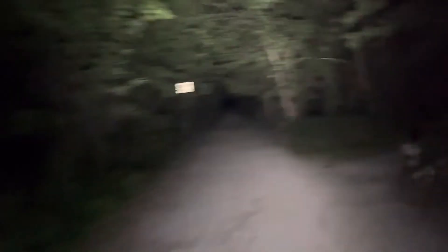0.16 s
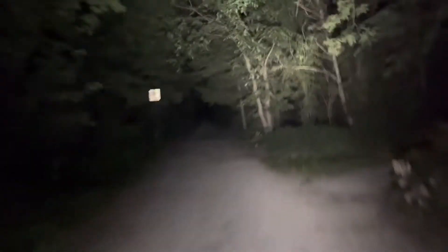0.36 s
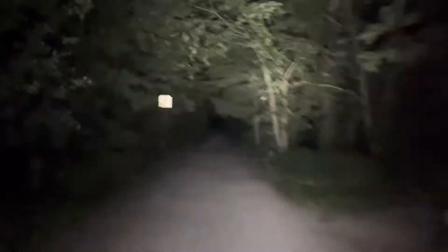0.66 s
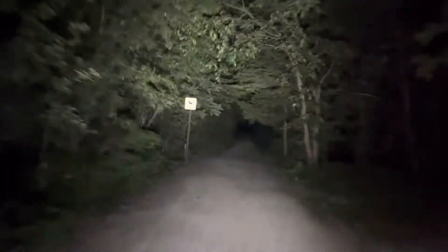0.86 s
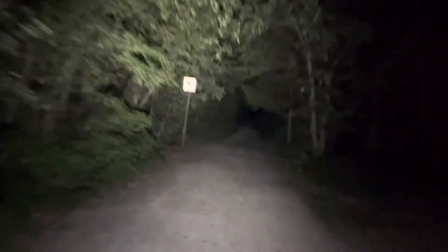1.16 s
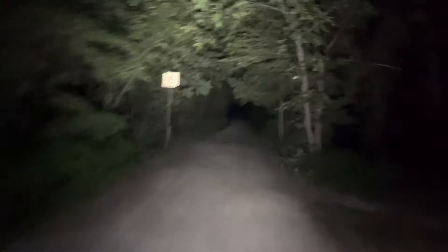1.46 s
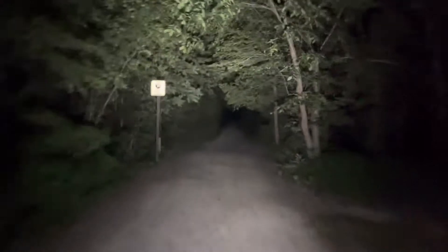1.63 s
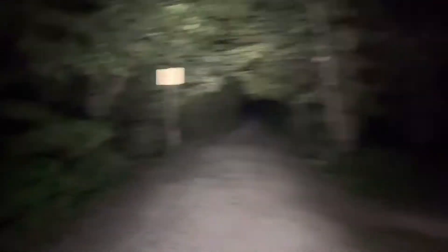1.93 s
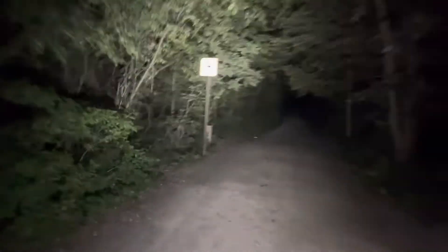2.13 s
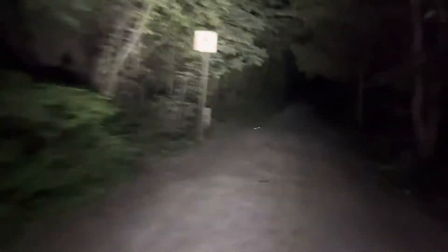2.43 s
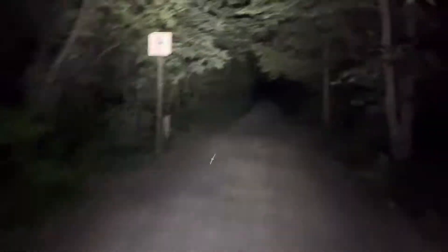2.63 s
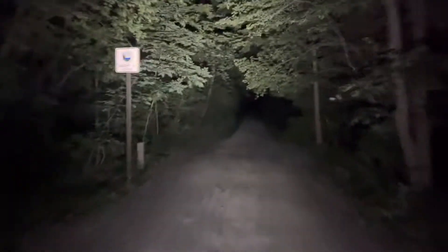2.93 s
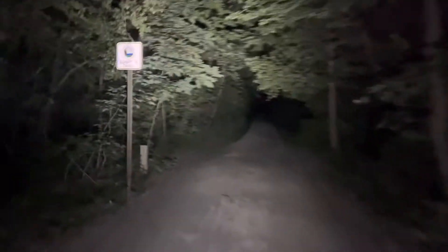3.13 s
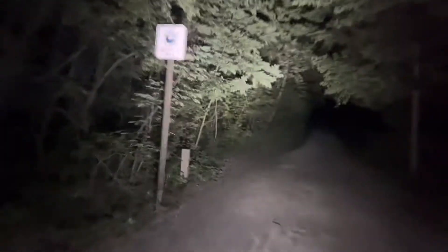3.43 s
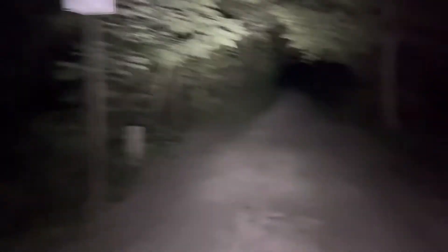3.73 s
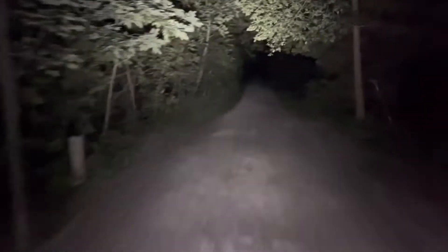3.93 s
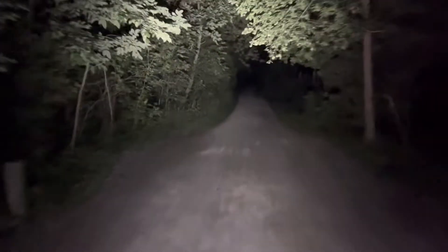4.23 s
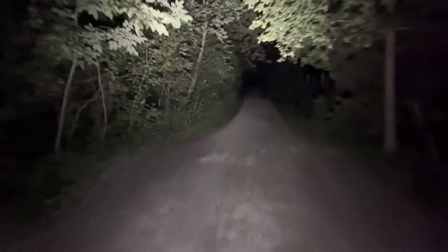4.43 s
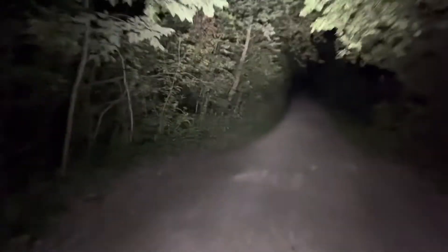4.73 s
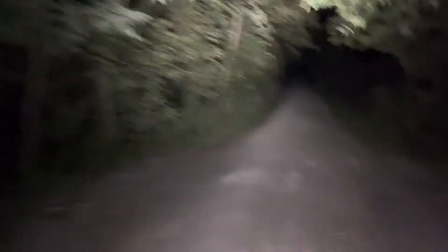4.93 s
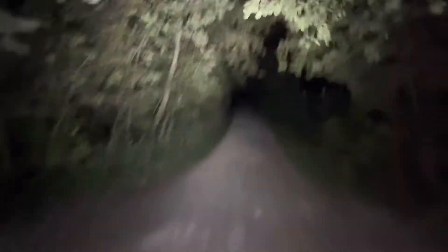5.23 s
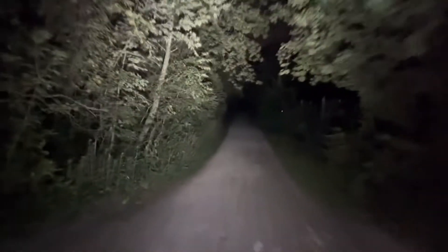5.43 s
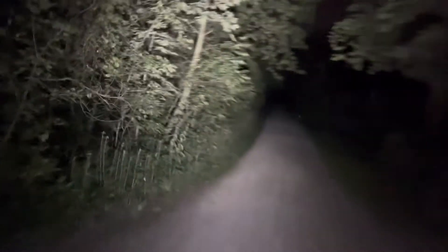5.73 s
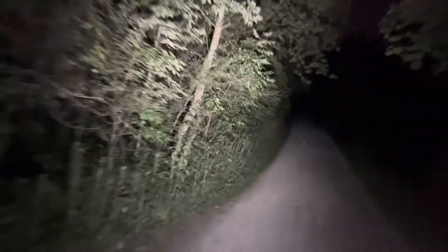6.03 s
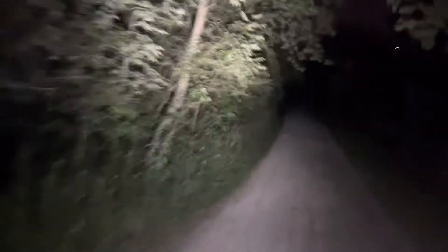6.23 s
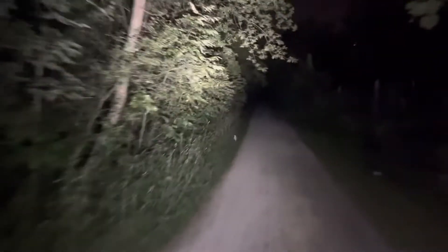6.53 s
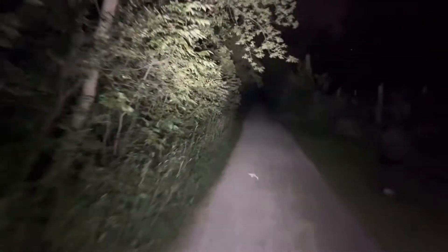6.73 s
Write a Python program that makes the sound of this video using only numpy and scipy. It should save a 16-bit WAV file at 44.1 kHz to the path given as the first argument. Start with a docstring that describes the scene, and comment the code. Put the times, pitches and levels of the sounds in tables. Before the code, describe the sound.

Someone walks fast over gritty gravel outdoors, crunching and scuffing, while a small hard object rattles close by and soft handling thuds intrude.

```python
"""Quick steps on woodland gravel, recorder in hand

Each footfall is a load curve that drives the gravel: grains of noise and ringing pebbles crunch, the sole
scuffs, sand grinds, single stones snap, and something hard that is carried rattles close to the microphone.
The hand adds low bumps (brief decaying sines) and rumble (filtered noise); dull rubs and a wash of noise
stand for cloth, walking and outdoor air. Two faint, slightly rising sine tones sound near the end.
All but the bumps, rubs and tones are coloured, then spread over the recorder's two microphone ports."""
import sys
import numpy as np
from scipy import signal
from scipy.fft import rfft, irfft, next_fast_len
from scipy.io import wavfile
from scipy.ndimage import uniform_filter1d

SR = 44100
rng = np.random.default_rng(int(sys.argv[2]) if len(sys.argv) > 2 else 0)


def generate_wav(sig):
    """Save sig (samples, or channels by samples) to the path in sys.argv[1] as 16-bit PCM at SR."""
    pcm = np.round(np.clip(np.atleast_2d(sig).T, -1, 1) * 32767).astype(np.int16)
    wavfile.write(sys.argv[1], SR, pcm)


N = 302967
TIME = np.arange(N) / SR
SIZE = next_fast_len(N + 8192, real=True)  # room for filters to ring out
HZ = np.fft.rfftfreq(SIZE, 1 / SR)
CONTACT_TIME = np.arange(-512, 1536) / SR  # s, the contact itself at 0

# resonances of the casing and microphone ports: f/Hz, width/Hz, lift/dB
CASING = [(1295, 76, 6), (2160, 1140, 4.5), (5240, 280, -1.5), (6450, 420, 7.5), (9600, 160, 5.5),
          (11570, 270, 4)]


def gravel(pressure, sliding):
    """Pebbles and grit crunch in clumps under the sole; as it slides, fine grit scuffs and deeper stones shift."""
    # crunch of the grit: f/Hz, relative density/dB per Hz
    grit_colour = [(300, -6.5), (750, -4), (1100, 0.5), (1500, 7.5), (1800, -12), (2350, -5.5), (3500, -1),
                   (4900, 1), (5800, -5.5), (7500, -10.5), (14000, -69)]
    # hiss of the fine scuffing: f/Hz, relative density/dB per Hz
    scuff_colour = [(2000, -30), (4500, 12), (5400, -16), (6600, 3), (7600, 3), (8500, 3.5), (9700, 8.5),
                    (11500, 0), (13500, 5.5), (14500, -3), (16000, -54)]
    # deeper stones that shift when the sole slides: f/Hz, relative density/dB per Hz
    deep_colour = [(400, -19), (700, -13), (920, 10.5), (1300, -1), (2100, -2), (5000, -41)]
    ticks = pebbles(per_s=340, spread_db=3.0, low_hz=1600, high_hz=5480, cycles=4)
    grit = grains(per_s=300, spread_db=1.0, decay_s=0.0013)
    bite = evened(pressure) ** 0.27  # a loaded sole crackles, a light one mostly hisses
    crunch = bite * (amp(-11.0) * ticks + amp(-8.0) * grit) + amp(-9) * noise()
    scuff = amp(-4.0) * grains(per_s=330, spread_db=1.5, decay_s=0.0012) + amp(-6.0) * noise()
    clumps = flutter(per_s=28, depth_db=0.6)
    coarse = heard(crunch * clumps * pressure, grit_colour, CASING)
    fine = heard(scuff * clumps * sliding, scuff_colour, CASING)
    deep = heard(scuff * clumps * sliding, deep_colour, CASING)
    return shifting(coarse + amp(1.5) * fine + amp(-1.5) * deep, patch_db=2.4)


def pebbles(per_s, spread_db, low_hz, high_hz, cycles):
    """Small stones of many sizes tick at random, each dying within a few cycles of its own pitch."""
    out = np.zeros((2, N))
    t = np.arange(400) / SR
    when, size, kind, turn = rng.random((int(per_s * N / SR), 4)).T
    size = amp(spread_db * np.minimum(-np.log(1 - size), 3))
    pitch = low_hz * (high_hz / low_hz) ** kind
    for s, gain, hz, side in zip(when * N / SR, size, pitch, 2 * np.pi * turn):
        tick = gain * np.sqrt(hz) * np.exp(-hz * t / cycles) * np.sin(2 * np.pi * hz * t)
        add(out, s, np.outer([np.cos(side), np.sin(side)], tick))
    return evened(out)


def grains(per_s, spread_db, decay_s):
    """Tiny contacts at random moments, mostly weak, each a burst of noise that dies at once."""
    struck = rng.random(N) < per_s / SR
    sizes = amp(spread_db * np.minimum(rng.exponential(1, N), 4)) * struck
    power = signal.lfilter([1], [1, -np.exp(-2 / (decay_s * SR))], sizes ** 2)
    return evened(np.sqrt(power) * noise())


def sand(pressure):
    """Sand grinds finely under the stones, in dense grains coloured by the casing's resonances."""
    # ground sand: f/Hz, relative density/dB per Hz
    sand_colour = [(700, -24.5), (1150, -7.5), (1400, -2.5), (1750, -16.5), (2400, -12), (6000, -25.5)]
    grinding = grains(per_s=2500, spread_db=1.5, decay_s=0.00094)
    return amp(-13.5) * heard(grinding * pressure, sand_colour, CASING)


def stones(pressure):
    """Single stones slip and snap against their neighbours, each a noise crack with its own ring."""
    # large stones under the shoe: t/s, relative level/dB, relative brightness/dB, ring f/Hz
    large = [(0.162, -34, 6, 4260), (0.187, -38, -4.5, 1490), (0.2392, -45, 2, 2180),
             (0.2698, -42, -15, 2410), (0.2832, -44, -18, 2620), (0.3374, -42, -20, 2300),
             (0.3513, -38, 6, 2950), (0.540, -45, -22, 3000), (0.562, -36, -12, 1460),
             (0.616, -41, -13, 1400), (0.6495, -45, -18, 2210), (0.736, -43, -16, 2432),
             (0.7465, -41, -20, 4150), (0.827, -41.5, -21, 2370), (1.134, -43.5, -33, 1320),
             (1.2067, -40.5, -14, 3730), (1.247, -42, -11, 3000), (1.4384, -34, -24, 2300),
             (1.464, -36, -25, 3830), (1.4854, -40, -20, 3050), (1.6811, -34, -24, 3360),
             (1.9048, -38, -25, 3700), (1.9517, -44, -18, 3500), (1.963, -39, -14, 4370),
             (1.9925, -41, -14, 3520), (2.0335, -37.5, -18, 2160), (2.038, -34.5, -23, 3050),
             (2.3263, -43, -18, 2600), (2.342, -42, -20, 2500), (2.409, -36.5, -22, 1560),
             (2.4927, -33.5, -12, 1550), (2.508, -32.5, -38, 3620), (2.5234, -31.5, -7, 5230),
             (2.5837, -39, -24, 2100), (2.602, -39, -12, 2300), (2.626, -34, -8, 2400),
             (2.6505, -44, -14, 2100), (2.6563, -37, -24, 1800), (2.6701, -30.5, -31, 2140),
             (2.704, -35, -15, 2300), (2.7223, -26.5, -6, 2400), (2.759, -37, -12, 2330),
             (2.769, -35, -14, 2200), (2.778, -27.5, -6, 1940), (2.8223, -39, -17, 2600),
             (2.8355, -28, -18, 2000), (2.844, -32, -19, 2240), (2.8585, -36, -9, 1290),
             (2.8875, -34, -5, 2200), (2.954, -39, -23, 2500), (2.9653, -44, -17, 2400),
             (3.0011, -38, 4, 2400), (3.0416, -38, 3, 3000), (3.064, -33, -23, 2300),
             (3.101, -40, -14, 2200), (3.1171, -33.5, -17, 2300), (3.177, -25.5, -7, 2480),
             (3.1784, -25, -6, 1500), (3.19, -39, -17, 1370), (3.2373, -33.5, -6, 1390),
             (3.3013, -45.5, -12, 2000), (3.3661, -32, -8, 2440), (3.403, -36.5, 4, 4530),
             (3.4186, -40, -16, 2000), (3.434, -35, -10, 2000), (3.427, -31.5, -3, 1150),
             (3.4556, -27.5, -6, 2300), (3.4795, -33, -9, 1400), (3.483, -29.5, 0, 1310),
             (3.548, -42, -3, 2000), (3.574, -40.5, -2, 2400), (3.5965, -38, -17, 1990),
             (3.6408, -39, -34, 1400), (3.6668, -29, -17, 4050), (3.6725, -40, -26, 3900),
             (3.6695, -40.5, -20, 2400), (3.728, -43, -18, 1600), (3.776, -37.5, 16, 2670),
             (3.7965, -38.5, 17, 3500), (3.8877, -39.5, -2, 4453), (3.899, -40, -18, 1990),
             (3.9654, -44, -22, 2400), (4.056, -39, -14, 3520), (4.1208, -31, -24, 3100),
             (4.1227, -46, -26, 1300), (4.23, -36, -15, 2000), (4.091, -43, -17, 3600),
             (4.2947, -41, -12, 3000), (4.3194, -37.5, -13.5, 2310), (4.385, -35, -22, 3930),
             (4.4075, -41, -20, 3630), (4.4994, -44.5, -2, 2500), (4.5785, -41, -18, 3190),
             (5.034, -39.5, -10, 4480), (5.0478, -34, -8, 2100), (5.2432, -43, -13, 3500),
             (5.3617, -37, -18, 2740), (5.4, -39.5, -11, 3000), (5.452, -43, -18, 3600),
             (5.491, -39.5, -18, 2680), (5.547, -44, -12, 2600), (6.007, -39.5, -8, 2300),
             (6.028, -39, -14, 1890), (6.041, -39, -24, 2700), (6.0853, -41, 5, 3500),
             (6.1057, -40, -8, 2600), (6.216, -28.5, -20, 2080), (6.2205, -40, -12, 2070),
             (6.2356, -39, -12, 2100), (6.2485, -38, -22, 2000), (6.2738, -33, 3, 2200),
             (6.2793, -33.5, -8, 2300), (6.285, -41, -18, 2150), (6.295, -43, -14, 2100),
             (6.311, -43.5, -22, 2100), (6.318, -43, -22, 2100), (6.3937, -38, -16, 1300),
             (6.412, -37, -13, 4400), (6.541, -35.5, -5, 2200), (6.618, -39, -27, 1500)]
    # snapping stone: f/Hz, relative density/dB per Hz
    stone_colour = [(200, -56), (700, 6.5), (1050, 8), (1600, -1), (2600, -3.5), (4500, 2), (5800, -6),
                    (7500, -6), (9500, -7), (13000, -18.5), (16000, -17)]
    out = np.zeros((2, N))
    small = [(s, db, -13, 1800 * 2.35 ** kind) for s, db, kind in scattered(pressure, per_s=36, db=-3)]
    for s, db, bright_db, ring_hz in [*large, *small]:
        crack_s = 0.00088 * rng.uniform(.6, 1.6)
        snap = contact(CONTACT_TIME, lead_s=.002, lead_db=-21, crack_s=crack_s, settle_s=.005, settle_db=-10)
        # little body below the ring
        body_hz = np.clip(0.6 * ring_hz, 1250, 2200)
        snap = signal.lfilter(*signal.butter(2, body_hz, "high", fs=SR), snap)
        snap = tinted(snap, bright_db + 8, patchy_db=3.8, ring_hz=ring_hz, ring_db=6)
        add(out, s + CONTACT_TIME[0], amp(db) * snap)
    return amp(-10.0) * heard(out, stone_colour, CASING)


def rattle(jostle):
    """A small hard piece slides and knocks near the microphone, ringing briefly, a little differently each time."""
    # loud clicks of carried gear: t/s, relative level/dB, relative brightness/dB
    loud = [(0.0651, -39, 2), (0.1237, -40, 9.5), (0.18, -34, -1), (0.249, -41, 10.5), (0.4326, -39.5, 2),
            (0.4896, -31.5, 5), (0.546, -35, -3), (0.5551, -24.5, -3.5), (0.6057, -36, -7),
            (0.630, -37, -5), (1.182, -42, 0), (1.315, -33.5, 7), (2.25, -33.5, 0), (2.5635, -29, 2),
            (2.595, -29, -8), (2.6306, -21.5, -4.5), (2.6778, -22, 2), (2.8095, -28, -9),
            (2.834, -19, -3.5), (2.8402, -18.5, 0), (2.854, -30, -12), (2.8915, -32, -5), (3.156, -38, -12),
            (3.185, -23, -2), (3.1965, -34, -20), (3.2127, -31, -12), (3.451, -28.5, -5),
            (3.5174, -35.5, 11), (3.6977, -37, -2), (4.242, -36, 10), (4.2643, -33.5, -3),
            (4.4694, -38.5, -3), (4.587, -43.5, 3), (4.816, -42.5, 8), (4.8484, -42, 39), (4.887, -42, 14),
            (4.911, -34.5, -5), (4.9758, -39, -3), (5.2944, -43.5, 6), (5.877, -40, -8), (6.1402, -37, 2),
            (6.1583, -36, -4), (6.194, -37, -4), (6.215, -26, 10), (6.252, -39, 5), (6.3357, -36, -3),
            (6.404, -37, -3), (6.5486, -44, -1), (6.6086, -38, -1), (6.7152, -35, -3)]
    # clicking gear: f/Hz, relative density/dB per Hz
    rattle_colour = [(200, -10), (750, -9.5), (1100, -6), (2000, -4.5), (3000, -1), (4200, 0), (5200, 1),
                     (8200, -3), (9500, -0.5), (13000, -9.5), (16000, -12)]
    # fixed resonances of the rattling piece: f/Hz, width/Hz, lift/dB
    gear = [(5180, 450, 8.5), (1374, 140, 10.5), (3380, 460, -4), (2230, 510, 4), (11100, 210, 3)]
    out = np.zeros((2, N))
    small = [(s, db, -1 + 10 * (kind - .5)) for s, db, kind in scattered(jostle, per_s=12, db=10.5)]
    for s, db, bright_db in [*loud, *small]:
        knock = contact(CONTACT_TIME, lead_s=.002, lead_db=-15, crack_s=.0015, settle_s=.005, settle_db=-11)
        ring_hz = 5080 + 150 * rng.uniform(-1.2, 1)  # the main ring differs at random from knock to knock
        knock = tinted(knock, bright_db - 0.5, patchy_db=2.8, ring_hz=ring_hz, ring_db=5)
        add(out, s + CONTACT_TIME[0], amp(db) * knock)
    return amp(-12.0) * heard(out, rattle_colour, [*CASING, *gear])


def contact(t, lead_s, lead_db, crack_s, settle_s, settle_db):
    """A piece slides, strikes at t = 0 with a broad crack and chatters as it settles."""
    slide, crack, chatter = rng.standard_normal((3, 2, len(t)))
    jolts = np.repeat(amp(4 * rng.standard_normal(len(t) // 32)), 32)
    slide = evened(slide * jolts * np.exp(-abs(t) / lead_s) * (t < 0))
    crack = rfft(crack * np.exp(-abs(t) / crack_s) * (t >= 0))
    level_crack = irfft(crack / (abs(crack) + 1e-9))  # equally strong at every pitch
    crack = evened(level_crack * (t >= 0))
    chatter = evened(chatter * jolts * np.exp(-abs(t) / settle_s) * (t >= 0))
    return amp(lead_db) * slide + crack + amp(settle_db) * chatter


def tinted(burst, bright_db, patchy_db, ring_hz=3000, ring_db=0):
    """Gives one contact its own tilt, uneven resonances and main ring, at unit strength in the crunch band."""
    hz = np.fft.rfftfreq(burst.shape[1], 1 / SR)
    treble = np.clip(np.log2(hz / 3500 + 1e-6), -.3, .7)  # octaves from 3500 Hz
    uneven = np.interp(hz, np.linspace(0, SR / 2, 110), rng.standard_normal(110))
    ring = ring_db / (1 + ((hz - ring_hz) / 280) ** 2)
    spectrum = rfft(burst) * causal(0.71 * bright_db * treble + patchy_db * uneven + ring)
    crunch_band = (hz > 1200) & (hz < 6500)
    strength = np.mean(abs(spectrum[:, crunch_band]) ** 2, axis=1, keepdims=True)
    return irfft(spectrum * np.sqrt(burst.shape[1] / strength))


def scattered(strength, per_s, db):
    """Random contacts, denser and louder with a strength curve: rows (s, level dB, a chance value 0-1)."""
    when, size, kind = rng.random((int(per_s * N / SR), 3)).T
    share = np.cumsum(strength ** 1.8)  # contacts crowd together where the load is high
    at = np.searchsorted(share, when * share[-1])
    level_db = db + 20 * np.log10(strength[at]) + 10.5 * (size - .5)
    return np.transpose([at / SR, level_db, kind])


def load(rest_db, axis):
    """Strength of one layer over time: footfalls land, hold and lift, above a wash that slowly rises and falls."""
    # footfalls: t/s, time under load/s, then relative level/dB of crunch, fine scuffing, dull rustle
    steps = [(0.0, .09, -52.5, -62.5, -56), (0.14, 0.11, -48, -57, -46.5), (0.35, .26, -46, -56, -57),
             (0.699, .09, -52.5, -68.5, -50), (0.94, .26, -54, -60.5, -74), (1.42, .08, -49.5, -69.5, -59),
             (1.611, .14, -51, -67, -69), (1.887, .16, -51.5, -66.5, -72), (2.2, .29, -48.5, -60.5, -60),
             (2.48, .1, -47.5, -54, -43.5), (2.58, .17, -45.5, -52.5, -47.5), (2.8, .18, -46, -55, -49),
             (3.031, .16, -46, -51.5, -49.5), (3.42, .09, -46, -53, -45.5), (3.6, .1, -48, -54, -45.5),
             (3.768, .13, -46.5, -54, -45.5), (4.101, .06, -50, -58, -64), (4.232, .08, -51, -57, -60),
             (4.369, .15, -51.5, -62.5, -71), (4.8, .1, -52.5, -55.5, -55), (5.019, .14, -52.5, -63, -68),
             (5.27, .16, -49.5, -57, -64), (5.479, .08, -52, -63.5, -48), (5.868, .05, -51.5, -54, -47.5),
             (5.995, .06, -47, -57, -48.5), (6.109, .06, -54, -56, -50), (6.199, .13, -49, -55.5, -51.5),
             (6.521, .08, -53, -55, -49.5), (6.689, .06, -53.5, -59.5, -47.5)]
    # wash between the footfalls: t/s, level/dB on top of rest_db
    wash = [(0, 3.5), (.9, 0.5), (2.1, 0.5), (3.6, 2.5), (4.5, 0.5), (4.68, -0.5), (5.2, 1.5), (5.8, -1),
            (6.4, 1), (6.76, -0.5), (6.87, -8)]
    land_s, lift_s = 0.022, .05
    power = (amp(rest_db) * follow(wash)) ** 2
    t = np.arange(SR) / SR
    for step in steps:
        # the weight comes on, holds, then dies away
        weight = np.minimum(t / land_s, 1) * np.exp(-np.maximum(t - step[1], 0) / lift_s)
        add(power, step[0], (amp(step[axis]) * weight) ** 2)
    return np.sqrt(power)


def scuffs():
    """Brief dull rubs of a sole, of cloth or of the hand on the casing, as bands of noise."""
    # rubs: t/s, length/s, level/dB, centre f/Hz
    rubs = [(0.164, 0.069, -45.5, 338), (0.479, 0.14, -44.5, 279), (0.29, 0.15, -50.5, 268),
            (2.23, 0.21, -53, 226), (2.58, 0.18, -45.5, 242), (2.84, 0.073, -45.5, 230),
            (2.933, 0.044, -49, 513), (3.6, 0.15, -48, 129), (3.74, 0.17, -47, 135),
            (6.015, 0.05, -47.5, 610), (6.259, 0.039, -46, 230)]
    out = np.zeros((2, N))
    for s, length, db, hz in rubs:
        band = signal.butter(2, [hz / 1.5, hz * 1.28], "band", fs=SR, output="sos")
        rub = signal.sosfilt(band, noise()[0, :SR // 4])
        rub = evened(rub[-int(length * SR):])
        add(out, s, amp(db) * rub * signal.windows.tukey(len(rub), .6))
    return out


def handling():
    """The moving hand rumbles unevenly and now and then bumps the casing, a short low decaying sine."""
    # soft bumps on the recorder: t/s, relative level/dB, f/Hz
    bumps = [(0.071, -40, 54.8), (0.322, -39, 70), (.72, -41, 74.8), (1.23, -47, 70), (2.264, -31, 85),
             (2.842, -34, 166), (3.463, -31.5, 194), (3.49, -30.5, 177), (3.609, -29, 215),
             (3.618, -42, 85), (3.731, -38, 68), (3.764, -34, 72), (3.812, -32, 91), (3.878, -38, 129),
             (3.907, -32, 115), (4.491, -36.5, 97), (4.789, -44, 60.1), (6.62, -43, 64.4)]
    # restlessness of the hand: t/s, rumble level/dB
    hand = [(0, -46.5), (.25, -53), (.5, -58), (.8, -52.5), (1.4, -57), (1.88, -50.5), (2.07, -56.5),
            (2.5, -52.5), (3.1, -50.5), (3.55, -45.5), (3.79, -42), (3.88, -43), (3.95, -53.5),
            (4.65, -56.5), (4.85, -51.5), (5.28, -56), (5.75, -55), (6.4, -54.5), (6.87, -56)]
    # rumble: f/Hz, relative density/dB per Hz
    rumble_colour = [(10, -28), (25, -40), (45, -3), (72, -1), (95, -6), (130, -7), (180, -16),
                     (280, -19.5), (800, -55)]
    thuds = np.zeros(N)
    t = np.arange(SR // 4) / SR
    for s, db, hz in bumps:
        u = t * hz / 0.42  # a bump lasts only a cycle or two
        add(thuds, s, amp(db) * u * np.exp(1 - u) * np.sin(2 * np.pi * hz * t))
    rumble = noise() * follow(hand) * flutter(per_s=14, depth_db=0.4)
    return amp(0.5) * thuds + heard(rumble, rumble_colour)


def tones():
    """Short soft sine tones that rise a little."""
    # faint tones: t/s, length/s, level/dB, starting f/Hz, final f/Hz
    faint = [(6.012, 0.069, -43.5, 509, 540), (6.168, 0.14, -44.5, 325, 331)]
    out = np.zeros(N)
    for s, length, db, start_hz, end_hz in faint:
        hz = np.linspace(start_hz, end_hz, int(length * SR))
        tone = np.sin(2 * np.pi * np.cumsum(hz) / SR)
        add(out, s, amp(db) * signal.windows.tukey(len(hz), .7) * tone)
    return out


def rustle():
    """The dull wash of walking and of the air among the trees: noise that swells with each step."""
    # dull wash: f/Hz, relative density/dB per Hz
    rustle_colour = [(70, -14.5), (150, -5), (215, -2.5), (330, 1), (540, 0), (720, -9), (1000, -9),
                     (2000, -16.5), (8000, -32.5)]
    # hollow tones of the casing: f/Hz, width/Hz, lift/dB
    hollow = [(211.4, 17.6, 8), (327.6, 5.8, 4.5)]
    air = noise() * flutter(per_s=27, depth_db=-0.8) * load(rest_db=-49.5, axis=4)
    return shifting(heard(air, rustle_colour, [*CASING, *hollow]), patch_db=1.74)


def heard(pair, colour, peaks=()):
    """Rings two unrelated drives through a causal filter of unit energy and blends them onto the two ports."""
    # likeness of the ports: f/Hz, likeness (0-1)
    likeness = [(100, 1), (170, .95), (280, .75), (450, .3), (740, .55), (1250, .8), (1550, .6), (2100, .9),
                (3300, .78), (6400, .87), (8500, .96), (10500, .85), (15000, .82)]
    # phase between the ports: f/Hz, left lead/rad
    lead = [(150, 0), (330, -.4), (540, -1.1), (780, 0), (1080, .7), (1500, -1.6), (1800, -.1), (2300, 0),
            (2900, .7), (4600, .7), (5900, -1), (6800, -1.4), (8300, -3.1), (11300, -6.2), (12700, -6.3),
            (14700, -9.4)]
    # level between the ports: f/Hz, left minus right/dB
    balance = [(100, 0), (210, -.8), (330, -1.7), (500, -.8), (770, -6), (1170, -2.7), (1790, -2),
               (2740, -1.7), (4190, 1.2), (6400, .7), (10000, 0)]
    db = read(colour) + sum(lift / (1 + (2 * (HZ - hz) / width) ** 2) for hz, width, lift in peaks)
    shared, apart = rfft(pair, SIZE) * causal(db) / np.sqrt(np.mean(amp(db) ** 2))
    same = np.clip(read(likeness), 0, 1)
    shared = shared * np.sqrt((1 + same) / 2)
    apart = apart * np.sqrt((1 - same) / 2)
    lean = amp(read(balance) / 2) * np.exp(.5j * read(lead))
    return irfft([(shared + apart) * lean, (shared - apart) / lean], SIZE)[:, :N]


def causal(db):
    """A minimum-phase filter spectrum with these levels, which rings only after the blow."""
    cepstrum = irfft(np.log(amp(db)))
    half = len(cepstrum) // 2
    cepstrum[1:half] *= 2
    cepstrum[half + 1:] = 0
    return np.exp(rfft(cepstrum))


def shifting(x, patch_db):
    """The colour wanders at random in small patches of time and pitch."""
    z = signal.stft(x, nperseg=512)[2]
    patches = uniform_filter1d(rng.standard_normal(z.shape[1:]), size=4, axis=0)
    patches = evened(uniform_filter1d(patches, size=5, axis=1))
    return signal.istft(z * evened(amp(patch_db * patches)), nperseg=512)[1][:, :N]


def flutter(per_s, depth_db):
    """A gain that wanders at random."""
    knots = rng.standard_normal(N)
    return evened(amp(depth_db * np.interp(TIME * per_s, np.arange(N), knots)))


def noise():
    """Two unrelated white noises."""
    return rng.standard_normal((2, N))


def amp(db):
    """Decibels to gain."""
    return 10 ** (np.asarray(db) / 20)


def evened(x):
    """Scales to rms 1."""
    return x / np.sqrt(np.mean(x ** 2) + 1e-20)


def read(points):
    """A table over frequency, joined on a log axis."""
    hz, value = np.transpose(points)
    return np.interp(np.log(HZ + 1), np.log(hz + 1), value)


def follow(rows):
    """A dB curve over time as a gain for every sample."""
    s, db = np.transpose(rows)
    return amp(np.interp(TIME, s, db))


def add(mix, s, sound):
    """Mixes a sound in at time s."""
    part = mix[..., max(round(s * SR), 0):][..., :sound.shape[-1]]
    part += sound[..., :part.shape[-1]]


def scene():
    """Everything that reaches the two ports; the footfalls drive gravel, sand, stones, gear and rustle."""
    # between footfalls the gravel keeps settling and clothes keep brushing
    pressure = load(rest_db=-49.5, axis=2)
    sliding = load(rest_db=-65, axis=3)
    underfoot = gravel(pressure, sliding) + sand(pressure) + stones(pressure)
    return underfoot + rattle(sliding) + scuffs() + handling() + tones() + rustle()


def record(dry):
    """The recorder's band limit, a steep low-pass at 16.1 kHz."""
    low_pass = signal.firwin(511, 16100, window=("kaiser", 9), fs=SR)
    return signal.oaconvolve(dry, low_pass[None], "same")


dry = scene()
out = record(dry)
generate_wav(out)
```